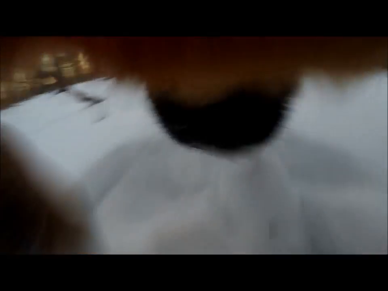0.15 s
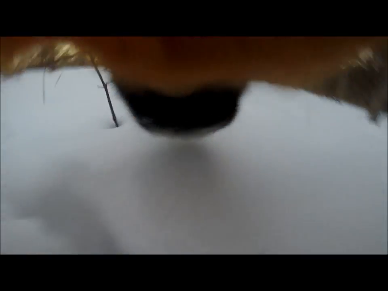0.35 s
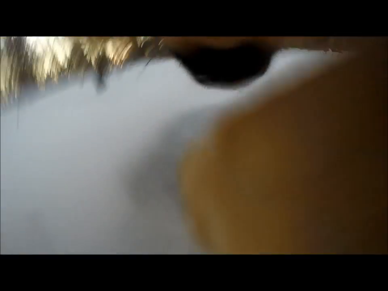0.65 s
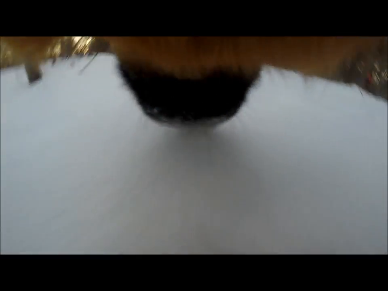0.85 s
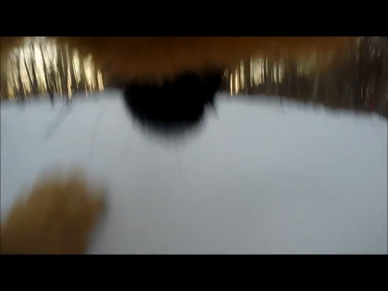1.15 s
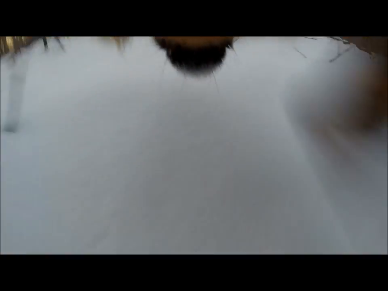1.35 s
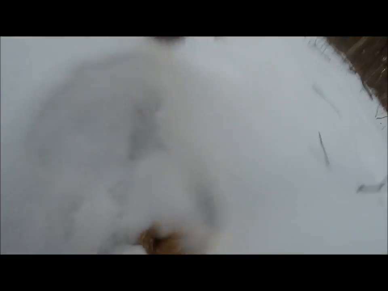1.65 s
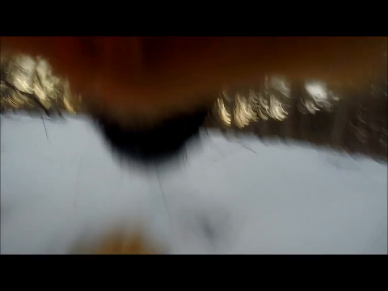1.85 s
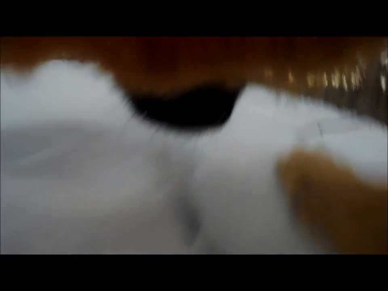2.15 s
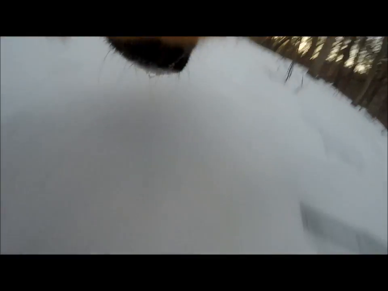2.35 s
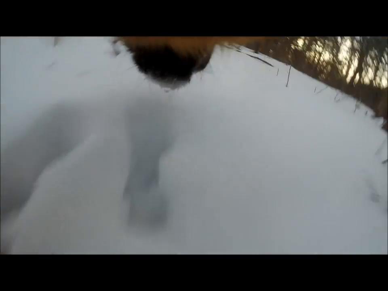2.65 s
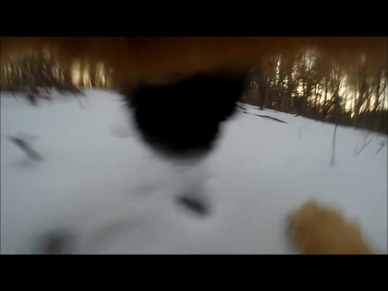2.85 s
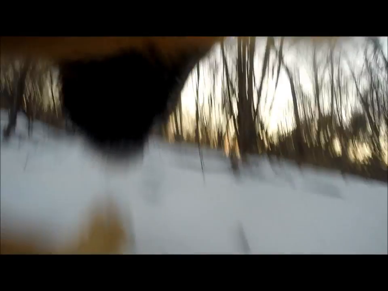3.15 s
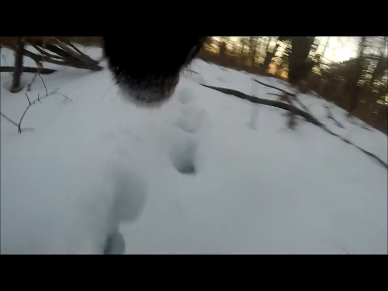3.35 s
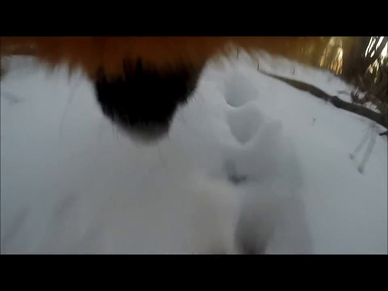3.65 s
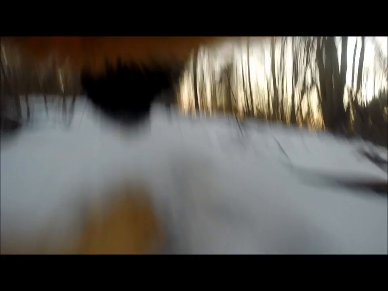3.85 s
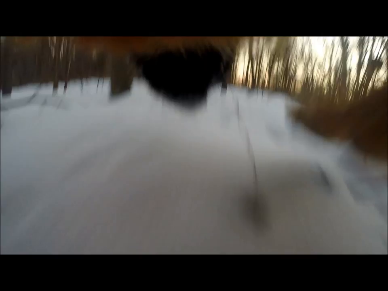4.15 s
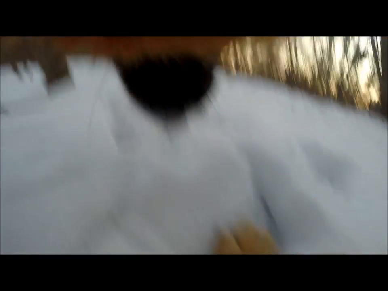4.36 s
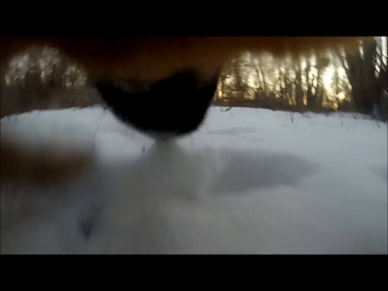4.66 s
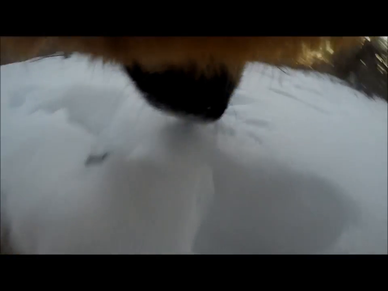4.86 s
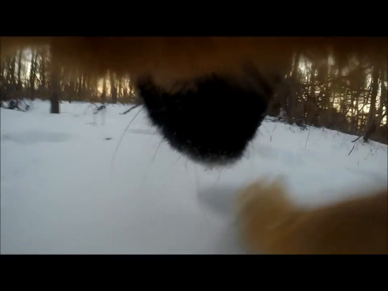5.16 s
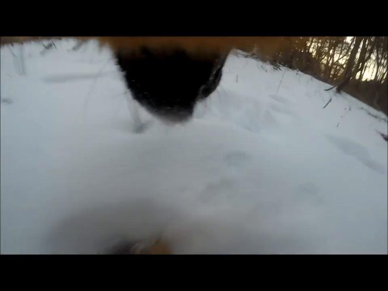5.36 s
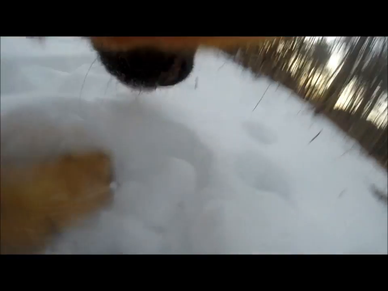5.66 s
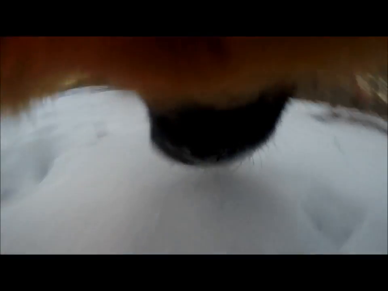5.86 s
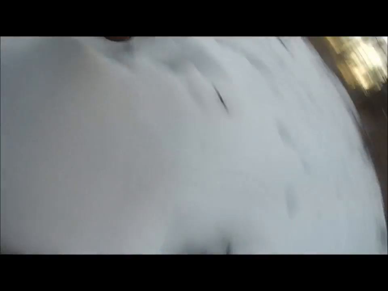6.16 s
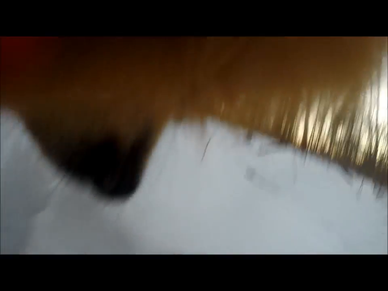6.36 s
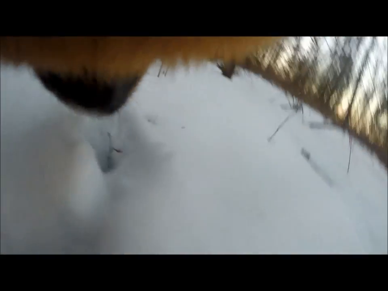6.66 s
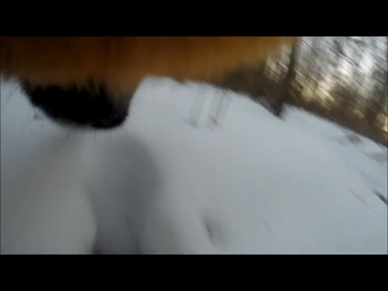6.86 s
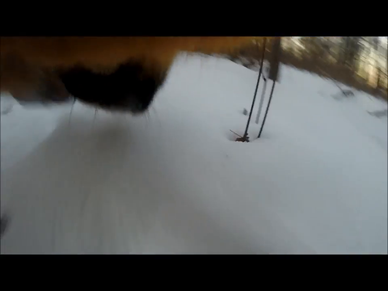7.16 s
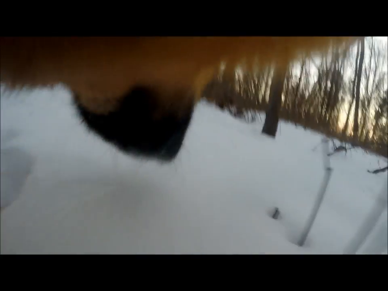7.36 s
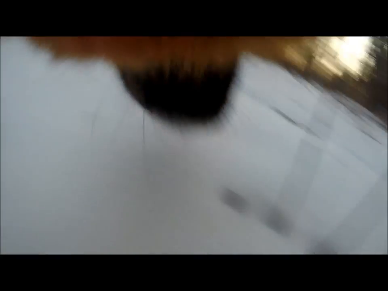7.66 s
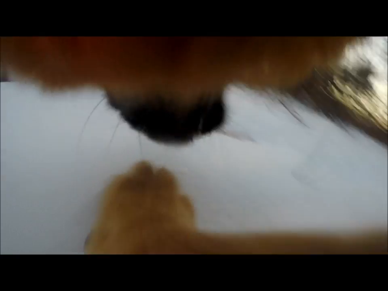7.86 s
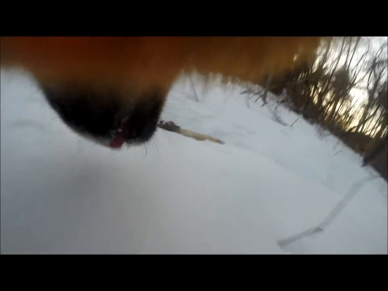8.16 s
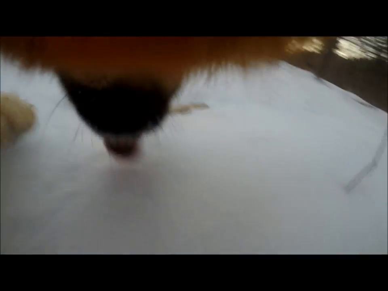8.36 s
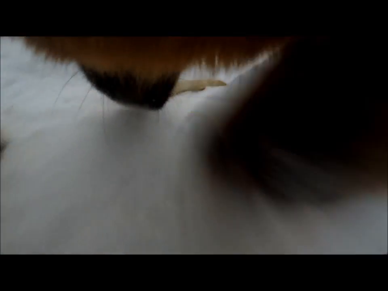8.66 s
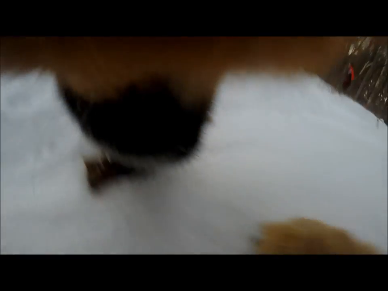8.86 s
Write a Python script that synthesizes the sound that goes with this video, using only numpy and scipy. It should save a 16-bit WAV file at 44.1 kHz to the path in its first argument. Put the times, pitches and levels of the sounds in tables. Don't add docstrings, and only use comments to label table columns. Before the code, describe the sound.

Close and muffled, from a sealed plastic case on a dog's collar in quiet snowy woods with faint hiss. It opens with a burst of crunch and spray, then at 0.2 s a violent hollow crack with a thin metallic ring. A brief lull has light ticks and a knock at 0.7. From 1 to 3 s bounding builds: granular snow crunches, hard airy pants, low heaving rumble, a bright scrape near 1.9 and an overloaded knock at 2.5. From 3.2 to 5.4 crunching and panting continue under frequent plastic clicks, clustered around 4.0-4.3 and sharp at 5.1. A hard distorted jolt hits at 5.56, scraping rattles at 6.15, another jolt at 6.5, then a short fur swish stops abruptly. Movement turns soft and hollow around 7, with a snort at 7.3 and a jolt at 7.9. Near quiet follows, until snorts, sharp ticks and a crunch at 8.7-9.

```python
import sys
import numpy as np
from scipy import signal
from scipy.fft import rfft, irfft, next_fast_len
from scipy.io import wavfile
from scipy.ndimage import uniform_filter1d, map_coordinates

SR = 44100
rng = np.random.default_rng(int(sys.argv[2]) if len(sys.argv) > 2 else 0)


def file_out(sig):
    cols = np.atleast_2d(sig).T
    lim = np.clip(cols, -1, 1)
    pcm = np.round(lim * 32767).astype(np.int16)
    wavfile.write(sys.argv[1], SR, pcm)


def undo_db(level):
    steps = np.asarray(level, float) / 20
    return 10 ** steps


N = 396900

# start_s, level_db
PACE = [(0, -48.5), (.16, -41), (.25, -61.5), (.5, -51.5), (.84, -56.5), (1.15, -46), (1.9, -47.5),
        (2.65, -51), (2.9, -43), (3.4, -49), (4.9, -46.5), (5.53, -46), (5.63, -51), (6.7, -58),
        (7.07, -63), (7.6, -52), (8.05, -67), (9.0, -47)]
# start_s, strength_db
POCKET = [
    (6.45, -30.5),
    (6.6, -2.5),
    (7.85, -4.5),
    (8.0, -26),
]
# start_s, tag_ring_db, side_modes_db, gain_drop_db, look_ahead_s
OVERLOADS = [
    (.173, -31, -31, -16, .012),
    (5.563, -39, -20, -20, .004),
    (6.492, -39, -14, -18, .015),
    (7.914, -43, -10, -11, .008),
]
# centre_hz, width_hz, level_db
WALL_MODES = [(840, 890, -9.5), (1500, 256, 2), (2041, 260.5, -2.5)]
# centre_hz, width_hz, level_db
SHELL_MODES = [(2786, 690, 17.5), (3850, 740, -10.5)]
# freq_hz, density_db (per Hz)
SPRAY_SPECTRUM = [(2530, -24.5), (4300, -2), (5030, -9.5), (5560, -3), (6080, -7), (7900, -7),
                  (9140, -13.5), (10000, -8.5), (12000, -11), (13400, -13.5), (13700, -22), (15100, -24.5),
                  (15600, -31.5), (16300, -74)]
# freq_hz, density_db (per Hz)
RUB_SPECTRUM = [(35, -35.5), (60, 3), (209, -0.5), (339, -3.5), (409, -4), (678, -17), (1000, -8.5),
                (1300, -40.5), (2200, -120)]

PLUNGE_RISE, SWING_RISE, BURST_RISE = 174.5, 140, 2000


def unit(x):
    return x / np.sqrt(np.mean(x ** 2) + 1e-20)


def curves(rows):
    s, *cols = np.transpose(rows)
    return [np.interp(np.arange(N) / SR, s, c) for c in cols]


def wobble(rate):
    knots = rng.standard_normal(int(N * rate / SR) + 4)
    return map_coordinates(knots, [np.arange(N) * rate / SR])


def summed(*gains):
    return 10 * np.log10(sum(g ** 2 for g in gains))


def swells(*kinds):
    rows = sorted((*row, rise) for table, rise in kinds for row in table)
    t = np.arange(0, N / SR, .002)
    ends = [row[0] for row in rows[1:]] + [N / SR]
    gain = np.zeros(len(t))
    for (s, db, fade, rise), end in zip(rows, ends):
        before, after, overrun = (np.maximum(x, 0) for x in (s - t, t - s, t - end))
        gain += undo_db(db - max(rise, fade) * before - fade * after - 2900 * overrun)
    return np.interp(np.arange(N) / SR, t, gain)


def grit(grain_db, clump_db):
    return unit(rng.standard_normal(N) * undo_db(grain_db * wobble(900) + clump_db * wobble(70)))


def patchy(x, patch_db):
    z = signal.stft(x, nperseg=256)[2]
    field = uniform_filter1d(rng.standard_normal(z.shape), size=2, axis=0)
    field = uniform_filter1d(field, size=12, axis=1)
    return unit(signal.istft(z * undo_db(patch_db * unit(field)), nperseg=256)[1][:N])


def filtered(x, response):
    m = next_fast_len(N + 8192)
    return irfft(rfft(x, m) * response(np.fft.rfftfreq(m, 1 / SR)), m)[:N]


def colour(points):
    hz, db = np.transpose(points)
    return lambda f: undo_db(np.interp(np.log(f + 1), np.log(hz + 1), db))


def bumps(table, f):
    return undo_db(sum(db * np.exp(-((f - hz) / width) ** 2) for hz, width, db in table))


def modes(table):
    low, high = table[0][0] * 1.083, table[-1][0] * 0.988

    def response(f):
        skirt = (1j * f / low / (1 + 1j * f / low) / (1 + 1j * f / high)) ** 2
        total = 0
        for k, (hz, width, db) in enumerate(table):
            total = total + (-1) ** k * undo_db(db) * 1j * f * width / (hz * hz - f * f + 1j * f * width)
        return skirt * total
    return response


def voiced(drive, response):
    power = np.mean(np.abs(response(np.linspace(1, SR / 2, 20000))) ** 2)
    return filtered(drive, response) / np.sqrt(power)


def drifting(drive, response, depth):
    share = .5 + .5 * np.sin(2 * wobble(7))
    lower = voiced(np.sqrt(share) * drive, lambda f: response(f * (1 + depth)))
    upper = voiced(np.sqrt(1 - share) * drive, lambda f: response(f * (1 - depth)))
    return lower + upper


def sealed(x):
    # centre_hz, width_hz, level_db
    seal_peaks = [(1950, 110, 3.5), (2260, 130, -5.5), (3750, 140, 3), (4400, 160, -5), (5020, 140, -3.5)]
    return filtered(x, lambda f: bumps(seal_peaks, f))


def plough_level():
    # start_s, peak_db, fade_db_per_s
    plunges = [(0, -36, 119), (.16, -49, 235.5), (.74, -49, 135.5), (1.07, -42, 225), (1.22, -45, 303.5),
               (1.52, -38.5, 70), (1.75, -37, 129.5), (1.91, -32.5, 133.5), (2.17, -46, 22),
               (2.42, -41.5, 161), (3.21, -42.5, 37.5), (3.52, -40.5, 100), (3.54, -48, 9), (3.74, -42, 40),
               (3.94, -36, 120), (4.25, -44.5, 21.5), (4.67, -39, 128.5), (4.86, -57, 102),
               (5.16, -43.5, 149.5), (5.78, -46.5, 399.5), (5.955, -47, 82), (6.015, -58, 176.5),
               (6.2, -39, 162.5), (6.27, -51, 251.5), (6.37, -36, 70), (6.405, -58, 600), (6.5, -45.5, 81),
               (7.17, -48.5, 76), (7.25, -47, 100), (7.31, -64.5, 20), (7.36, -39, 265), (7.48, -49, 23.5),
               (7.54, -41, 191), (7.65, -50, 100.5), (7.75, -40.5, 61), (7.79, -46, 249), (7.86, -40.5, 53),
               (7.92, -47.5, 502.5), (8.45, -51, 205), (8.83, -32, 309.5), (8.96, -43.5, 200.5)]
    return summed(undo_db(curves(PACE)[0]), swells((plunges, PLUNGE_RISE)))


def ploughing(plough_db):
    # centre_hz, width_hz, level_db
    cavity = [(1043.2, 926, 3.5), (1610, 452, 12), (1985.7, 160, 5.5), (2550, 660, -0.5)]
    crush = undo_db(plough_db + 2.7 * wobble(30)) * patchy(grit(2.1, 2.66), patch_db=2.5)
    pocket = voiced(crush * undo_db(curves(POCKET)[0]), modes([(2083.5, 120, 0)]))
    return drifting(crush, cavity and modes(cavity), .07) - pocket


def spraying(plough_db, pant_db, shared_db):
    # start_s, peak_db, fade_db_per_s
    puffs = [
        (0, -30, 300),
        (.36, -58, 28),
        (1.22, -48, 95.5),
        (4.76, -38, 211),
        (5.0, -53, 36),
        (6.75, -61, 52.5),
        (7.85, -50.5, 204),
        (8.05, -63, 102.5),
        (8.34, -53.5, 67),
    ]
    # start_s, peak_db, fade_db_per_s
    flicks = [
        (6.575, -40.5, 898.5),
        (6.665, -43.5, 503),
        (7.333, -45.5, 59.5),
        (8.7, -56, 101),
        (8.859, -46.5, 89),
        (8.941, -59.5, 401),
        (8.981, -43, 200),
    ]
    # centre_hz, width_hz, level_db
    vents = [(4583, 320, 5), (5510, 250, 2), (6430, 300, 5), (8030, 420, 2), (9580, 410, 1.5)]
    mist = undo_db(-39.5 + 1.305 * (pant_db + 32.0))
    kicked = undo_db(plough_db - 12.5)
    spray_db = summed(mist, kicked, swells((puffs, 360), (flicks, BURST_RISE)))
    port = lambda f: (f < 15450) * colour(SPRAY_SPECTRUM)(f) * bumps(vents, f)
    return voiced(undo_db(spray_db + shared_db) * patchy(grit(2.47, 2.56), patch_db=3.0), port)


def pant_level():
    # start_s, peak_db, fade_db_per_s
    breaths = [(.02, -35, 104.5), (.12, -55, 161.5), (.74, -39, 146), (.9, -41, 232), (1.07, -35, 402.5),
               (1.25, -35, 46.5), (1.6, -33, 48), (1.91, -31, 91.5), (2.268, -26.5, 115.5),
               (2.59, -35.5, 124), (2.97, -32.5, 111.5), (3.23, -41, 51), (3.6, -38, 13.5),
               (3.78, -40, 46.5), (3.94, -32.5, 54), (4.03, -35.5, 69), (4.27, -48, 41.5), (4.34, -35, 23),
               (4.76, -38.5, 31.5), (5.31, -33.5, 90), (6.36, -47.5, 212), (6.56, -48, 47),
               (6.89, -66, 154), (7.18, -68.5, 10.5), (7.5, -44, 125), (7.745, -44, 250),
               (8.06, -62.5, 26.5), (8.918, -54, 20)]
    # start_s, peak_db, fade_db_per_s
    snorts = [
        (7.332, -38.5, 33),
        (8.315, -54, 31.5),
        (8.7, -39, 93.5),
        (8.857, -37.5, 29.5),
    ]
    resting = undo_db(1.307 * (curves(PACE)[0] + 47) - 48 - 2)
    return summed(resting, swells((breaths, 267), (snorts, BURST_RISE)))


def panting(pant_db, shared_db):
    # centre_hz, width_hz, level_db
    soft_nose = [(1540, 500, -14), (2895.4, 1010, 6.5), (3493, 647, 12)]
    # centre_hz, width_hz, level_db
    hard_nose = [(2817, 1100, 4.5), (3491, 384.5, 13), (5320, 320, -5)]
    effort = np.clip((pant_db + 49.5) / 12, 0, 1)
    air = undo_db(pant_db + shared_db) * patchy(grit(1.0, 2.065), patch_db=3.0)
    soft = drifting(np.sqrt(1 - effort) * air, modes(soft_nose), .03)
    hard = drifting(np.sqrt(effort) * air, modes(hard_nose), .03)
    return soft + hard


def running():
    plough_db, pant_db = plough_level(), pant_level()
    shared_db = 1.2 * wobble(30)
    plough = ploughing(plough_db)
    spray = spraying(plough_db, pant_db, shared_db)
    return sealed(plough + spray + panting(pant_db, shared_db))


def swinging():
    # start_s, peak_db, fade_db_per_s
    swings = [(0, -57.5, 27), (.87, -41.5, -5), (1.36, -37, 57.5), (1.7, -38, 5), (2.0, -29, 161.5),
              (2.23, -32, 18), (2.49, -39.5, 56), (3.2, -34, 50.5), (3.59, -29.5, 59.5), (4.0, -33, 82.5),
              (4.6, -42.5, 44), (5.12, -31, 166.5), (5.5, -32.5, 110.5), (5.85, -42, 86), (6.31, -33, 65),
              (6.46, -42.5, 75.5), (7.37, -40, 0.5), (7.62, -31, 88.5), (8.48, -51.5, 19.5),
              (8.73, -40, 10), (8.93, -40, 98.5)]
    # freq_hz, density_db (per Hz)
    heave_spectrum = [(7.1, -17), (12, 5), (24, -2), (48, -13), (130, -36), (170, -43), (290, -120)]
    heave_db = summed(undo_db(curves(PACE)[0] + 4.5), swells((swings, SWING_RISE)))
    rub_db = summed(undo_db(heave_db - 23.5), undo_db(plough_level() - 8.5))
    rub_db = rub_db - 6 * undo_db(curves(POCKET)[0])
    rub_db = np.minimum(rub_db, -50)
    heave = voiced(undo_db(heave_db + 1.4 * wobble(8.8)) * rng.standard_normal(N), colour(heave_spectrum))
    return heave + voiced(undo_db(rub_db + 1.5 * wobble(22)) * grit(1.1, 2.5), colour(RUB_SPECTRUM))


def hiss():
    # freq_hz, density_db (per Hz)
    hiss_spectrum = [(35, -37.5), (60, 1), (71, -18), (124, -19), (458, -24.5), (1410, -20), (1820, -25.5),
                     (2250, -17.5), (2410, -20.5), (3420, -33), (16000, -82)]
    return undo_db(-65.5) * voiced(rng.standard_normal(N), colour(hiss_spectrum))


def ducking():
    t, gain_db = np.arange(N) / SR, np.zeros(N)
    for s, *_, drop_db, ahead in OVERLOADS:
        after = t - s + ahead
        gain_db += drop_db * np.clip(after / .002, 0, 1) * np.exp(-np.abs(after) / 0.04)
    return undo_db(gain_db)


def ticks():
    # start_s, peak_db, hardness_db (crack over hollow)
    face_hits = [(.173, -5, -17), (.18, -21.5, -33.5), (.359, -39.5, 32), (.499, -38.5, -4),
                 (2.382, -23.5, 7.5), (3.752, -39, -19.5), (4.001, -49.5, -4.5), (4.707, -24.5, -26.5),
                 (6.492, -10.5, -16), (7.216, -43, 5.5), (7.9135, -23, -24), (8.762, -20.5, 27.5)]
    side_hits = [(.193, -32, -6.5), (.709, -17.5, -4), (1.122, -37, 19.5), (2.206, -30, -37),
                 (3.218, -17.5, -14.5), (3.588, -28, -29.5), (3.935, -22, -28.5), (3.946, -28.5, -20),
                 (4.161, -13.5, 0), (4.17, -22.5, 20), (4.231, -27, -5), (4.238, -24.5, -18.5),
                 (4.255, -25.5, -22), (4.33, -19, -17), (4.99, -15.5, 10.5), (5.046, -20.5, 17.5),
                 (5.291, -20.5, 8), (5.386, -36, -32), (5.671, -20, -20.5), (5.684, -40, -12.5),
                 (5.876, -15, -2), (6.03, -26.5, -7.5), (6.344, -12.5, 1), (8.667, -33.5, -18.5)]
    edge_hits = [(2.362, -18.5, 5), (2.526, -8, -4.5), (4.19, -27, 18.5), (4.837, -24, -20),
                 (5.138, -8, 30.5), (5.172, -17.5, -6), (5.266, -21, -6.5), (5.566, -19.5, -31.5),
                 (6.269, -46.5, -14.5), (6.474, -26, -15.5), (7.803, -21.5, 10), (8.231, -25.5, 0.5),
                 (8.578, -24, 0.5), (8.994, -19, -11.5)]
    wall_db, dulling = -4.5, 0.586
    drive, t = np.zeros((3, N + 1024)), np.arange(1024) / SR
    fade = undo_db(-60 * t / np.array([[.012], [.012], [.009]]))
    places = (face_hits, 11.5), (side_hits, -2), (edge_hits, -15.5)
    hits = sorted((*row, shell_db) for rows, shell_db in places for row in rows)
    for (s, db, hard, shell_db), noise in zip(hits, rng.standard_normal((len(hits), 3, 1024))):
        parts = np.array([wall_db - dulling * hard, shell_db, wall_db + (1 - dulling) * hard])
        burst = fade * np.sign(noise) * np.abs(noise) ** 1.3
        drive[:, round(s * SR):][:, :1024] += undo_db(db - 5.5 + parts[:, None]) * burst
    shell = lambda f: modes(SHELL_MODES)(f) * (1j * f / (2400 + 1j * f)) ** 2
    responses = modes(WALL_MODES), shell, colour(SPRAY_SPECTRUM)
    return sum(voiced(d[:N], response) for d, response in zip(drive, responses))


def tag():
    # freq_hz, t60_s
    plate_modes = [(1836, .46), (362, .5), (2655, .2)]
    ring, t = np.zeros(N), np.arange(SR // 2) / SR
    for s, db, side_db, *_ in OVERLOADS:
        for (hz, t60), level_db in zip(plate_modes, (db, db + side_db, db + side_db)):
            ring[round(s * SR):][:len(t)] += undo_db(level_db - 60 * t / t60) * np.sin(2 * np.pi * hz * t)
    return ring


def scrapes():
    # start_s, length_s, hollow_db, bright_db
    fur_drags = [(.173, 0.01436, -17, -30.5), (.283, 0.0393, -52.5, -50), (.486, 0.0531, -39.5, -37.5),
                 (.631, 0.0416, -33, -31.5), (1.055, 0.0187, -44.5, -54), (1.21, 0.0384, -36, -32.5),
                 (1.544, 0.0416, -32, -45), (1.98, 0.0242, -40.5, -38.5), (2.322, 0.0259, -35.5, -35.5),
                 (2.644, 0.0251, -37, -52.5), (3.185, 0.0348, -37, -38.5), (3.322, 0.015, -31, -35),
                 (3.587, 0.0305, -37, -36.5), (3.93, 0.0295, -37.5, -35), (4.039, 0.0384, -30, -47),
                 (4.411, 0.0275, -29, -51), (4.825, 0.0106, -37.5, -46), (5.608, 0.00776, -40.5, -36.5),
                 (5.659, 0.01056, -38.5, -35), (5.681, 0.0091, -36, -37.5), (5.691, .009, -31.5, -44),
                 (5.856, 0.015, -35, -38), (5.875, 0.0192, -33.5, -34), (6.012, 0.024, -38.5, -47.5),
                 (6.106, 0.0125, -45, -29.5), (6.144, 0.0409, -25, -30.5), (6.4925, 0.0124, -22, -29.5),
                 (7.982, 0.0273, -47.5, -51.5), (8.853, 0.0105, -43.5, -27)]
    snow_drags = [(.189, 0.0075, -25, -23.5), (.705, 0.027, -40, -34), (1.867, 0.026, -22, -14.5),
                  (2.539, 0.0118, -34, -28), (2.849, 0.022, -37, -45.5), (4.325, 0.011, -34.5, -27),
                  (4.743, 0.036, -52.5, -37), (5.563, 0.011, -30, -29.5), (6.151, 0.0243, -22.5, -36.5),
                  (6.452, 0.03, -37, -42.5), (8.214, 0.0371, -51.5, -48)]
    chest_drags = [(.765, 0.005, -44, -54.5), (1.655, 0.022, -46.5, -55.5), (1.99, 0.021, -47.5, -59.5),
                   (2.235, 0.016, -47, -40), (2.345, 0.0094, -53, -47.5), (2.505, .032, -35, -24.5),
                   (2.97, 0.028, -55, -59.5), (3.325, 0.026, -61, -61.5), (3.745, 0.012, -44.5, -55),
                   (4.415, 0.022, -51, -60.5), (4.705, .012, -51, -55), (5.7, 0.0056, -52, -49.5),
                   (6.293, 0.0236, -41.5, -45.5), (6.33, .016, -45, -56), (7.735, 0.014, -46, -54),
                   (8.74, 0.015, -51, -62)]
    stroke = np.zeros((3, N))
    grains = np.array([grit(4.3, 2.3), grit(3.6, 2.4), grit(3.5, 2.3)])
    kinds = (fur_drags, -1), (snow_drags, -13), (chest_drags, 9.5)
    for rows, thud_db in kinds:
        for s, length, hollow_db, bright_db in rows:
            parts = undo_db([hollow_db + thud_db, hollow_db, bright_db])[:, None]
            span = slice(round(s * SR), round(s * SR) + round(length * SR))
            shape = np.sin(np.linspace(0, np.pi, round(length * SR))) ** .35
            rattle = grains[:, span] / grains[:, span].std(axis=1, keepdims=True)
            stroke[:, span] += parts * shape * rattle
    thud, hollow, bright = stroke
    dull = voiced(thud, colour(RUB_SPECTRUM)) + voiced(hollow, modes(WALL_MODES))
    return dull + voiced(bright, modes(SHELL_MODES)) * 0.523 + voiced(bright, colour(SPRAY_SPECTRUM)) * 0.5


def specks():
    # start_s, peak_db, low_ring_hz, high_ring_hz, high_over_low_db
    crumbs = [(0.3895, -29, 1600, 5510, -10), (1.1967, -24, 1590, 7640, -0.5),
              (1.2264, -12.5, 1353, 8350, -6), (1.928, -18, 3230, 5420, 6.5), (1.9974, -19, 3370, 5430, -5),
              (2.1824, -23.5, 1600, 4680, -2.5), (3.2534, -30, 1560, 4610, -8.5),
              (3.8776, -17.5, 1447, 4540, -13.5), (4.0013, -5.5, 3350, 4740, -27.5),
              (4.0871, -21, 3240, 5450, -3.5), (4.1245, -16, 3165, 5660, -11.5),
              (4.4752, -29, 3440, 4700, -6), (4.6754, -13.5, 1603, 4590, -5.5),
              (5.2154, -42, 1640, 5740, -7), (5.3404, -16, 3630, 5720, -9),
              (5.3624, -19.5, 3330, 5580, -7.5), (6.2014, -31.5, 1840, 12850, 4),
              (6.3994, -26, 1470, 5450, -5.5), (6.6363, -26, 1390, 4540, -2),
              (6.8914, -27, 3150, 6780, -15.5), (6.9611, -28, 1192, 5420, -14.5),
              (7.1854, -29, 1500, 5320, -7.5), (7.7784, -26, 2000, 5360, -5),
              (8.5076, -37.5, 1520, 5640, -13.5), (8.5544, -41.5, 1590, 12900, -6.5),
              (8.7944, -20.5, 1610, 3280, 5), (8.9404, -16.5, 3834, 10200, -11.5),
              (8.9511, -18.5, 1220, 7590, -5.5), (8.98, -19, 2000, 5830, -6)]
    lump_rings = [(0.173, 6.5, 3850, 5980, -3.5), (0.1804, 9, 1582, 2880, -12.5),
                  (0.1934, -5.5, 4525, 5380, -12.5), (0.3581, -25.5, 3050, 5310, -4.5),
                  (1.1228, -31.5, 3580, 6240, 0.5), (1.8701, -4, 3530, 5580, -5),
                  (2.3815, -21, 2600, 5240, -5), (2.5257, -9.5, 3086, 11810, 1),
                  (4.1614, -6.5, 2410, 5735, -4.5), (4.1889, -36.5, 3360, 5500, -7),
                  (4.3296, -5.5, 3540, 5820, -19), (4.7067, -2.5, 3078, 1119, -2.5),
                  (4.9896, -20.5, 3080, 5130, 3.5), (5.0464, -18.5, 3240, 5220, -5),
                  (5.1367, 1, 3242, 5818, -8), (5.2909, -23.5, 3290, 5540, -3),
                  (5.8755, -20.5, 2610, 5520, -0.5), (6.344, -9.5, 2953, 6730, -5),
                  (7.216, -28, 3030, 9990, -4.5), (7.8012, -23, 2860, 7587, 2),
                  (8.2307, -32.5, 3612, 5740, -9), (8.5779, -27, 3700, 5496, -2),
                  (8.668, -20, 2790, 5790, -14), (8.761, -9, 4440, 6660, -7), (0.1738, 7, 3016, 1500, 0)]
    t60, detuning = 0.01243, 0.0784
    (out, cracks), t = np.zeros((2, N + 1024)), np.arange(1024) / SR
    onset = 1 - np.exp(-t / 0.00026)
    rows = [(s, db + gain_db, *rest) for table, gain_db in ((crumbs, -10), (lump_rings, -9))
            for s, db, *rest in table]
    for (s, db, low_hz, high_hz, high_db), chance in zip(rows, rng.standard_normal((len(rows), 2, 4, 1))):
        hz = np.array([[low_hz], [low_hz], [high_hz], [high_hz]])
        hz = hz * (1 + detuning * chance[0] * [[0], [1], [0], [1]])
        gains = undo_db(db + np.array([[0], [-6], [high_db], [high_db - 2.5]]) - 60 * t / t60)
        rings = gains * np.sin(2 * np.pi * hz * t + 3 * chance[1])
        out[round(s * SR):][:1024] += rings.sum(0) * onset
        crack = undo_db(db + high_db - 8.5 - 60 * t / 0.0054) * rng.standard_normal(1024)
        cracks[round(s * SR):][:1024] += crack
    return out[:N] + voiced(cracks[:N], colour(SPRAY_SPECTRUM))


def jolts():
    # start_s, length_s, peak_db, direction (sign)
    pushes = [(0.7087, 0.0074, -11.5, -1), (0.7137, 0.00297, -7.5, -1), (0.715, 0.00464, -11, 1),
              (0.719, 0.029, -16, 1), (1.21, 0.051, -15, 1), (1.54, 0.0194, -15.5, -1),
              (1.572, 0.0673, -9, 1), (1.867, 0.00663, -14, -1), (1.877, 0.0154, -9, 1),
              (1.911, 0.0408, -6.5, 1), (2.214, 0.0455, -17, 1), (2.5059, 0.002545, -2.5, -1),
              (2.5063, 0.012, -2.5, -1), (2.513, 0.0181, 0, 1), (2.525, 0.00502, -2, -1),
              (3.21, 0.0567, -14.5, 1), (3.893, 0.0297, -17, -1), (3.939, 0.0384, -13, 1),
              (5.5629, 0.002954, 8.5, -1), (5.565, 0.000459, 10, 1), (5.5654, 0.000389, 2, -1),
              (5.565, 0.00297, 0, 1), (5.567, 0.0135, -14, 1), (5.587, 0.0078, -16, 1),
              (5.841, 0.0092, -28, -1), (5.891, 0.0133, -24, -1), (6.1393, 0.0067, -20.5, -1),
              (6.1512, 0.00527, -17.5, -1), (6.1618, .0026, -8, -1), (6.299, 0.0159, -18.5, -1),
              (6.4921, 0.003326, 7.5, -1), (6.4931, 0.000506, 7, 1), (6.494, 0.000456, 5.5, 1),
              (6.498, 0.00478, -13, 1), (6.586, 0.01184, -24, 1), (7.841, 0.0042, -17.5, -1),
              (7.845, 0.00646, -16.5, -1), (7.9136, 0.00046, -5, -1), (7.9137, 0.0033, 9.5, 1),
              (7.9141, 0.0003286, 7, -1)]
    pressure = np.zeros(N)
    for s, length, db, direction in pushes:
        shape = np.hanning(round(length * SR)) ** 0.63
        pressure[round(s * SR):][:len(shape)] += np.sign(direction) * undo_db(db) * shape
    return filtered(pressure, lambda f: 1j * f / (22 + 1j * f))


def brush():
    # start_s, length_s, low_hz, high_hz
    sweep = (6.515, .075, 1900, 7800)
    s, length, low_hz, high_hz = sweep
    along = (np.arange(N) / SR - s) / length
    swell = np.clip(along, 0, 1) ** 1.7 * (along < 1)
    band = lambda f: 1 / (1 + (low_hz / (f + 1)) ** 6) / (1 + (f / high_hz) ** 16) / (1 + f / 6000)
    return voiced(undo_db(-34) * swell * grit(2.0, 2.0), band)


def scene():
    steady = (running() + swinging() + hiss()) * ducking()
    return (steady + ticks() + tag() + sealed(scrapes()) + specks() + jolts() + brush())[None]


def band_limit(x):
    return signal.sosfilt(signal.butter(12, 16480, fs=SR, output="sos"), x)


def record(dry):
    clipped = np.clip(dry[0], -1, 1)
    mix = filtered(clipped, lambda f: f < 16480)[None]
    return band_limit(mix)


dry = scene()
out = record(dry)
file_out(out)
```